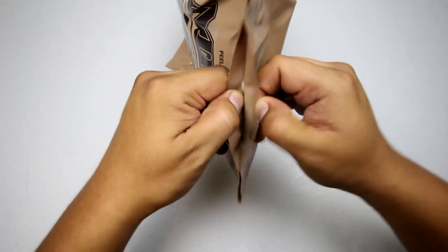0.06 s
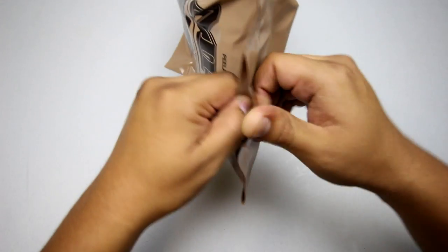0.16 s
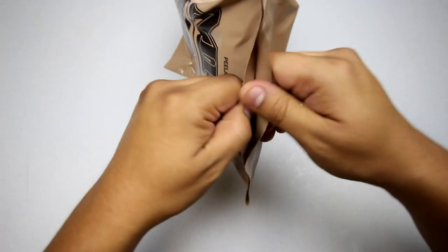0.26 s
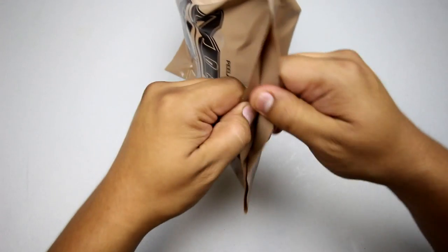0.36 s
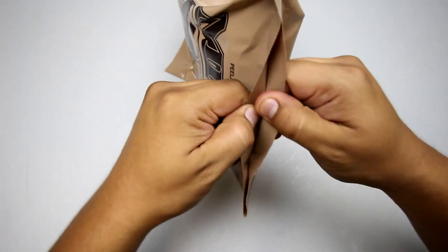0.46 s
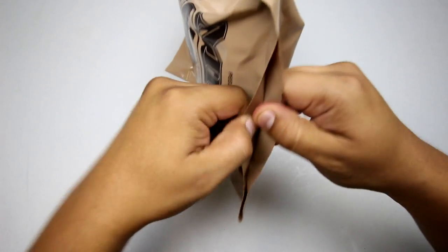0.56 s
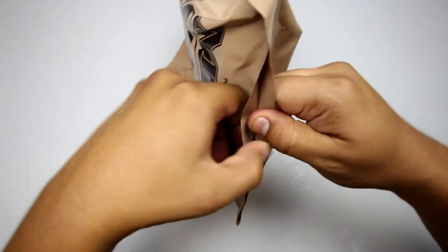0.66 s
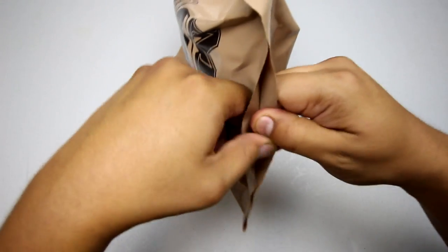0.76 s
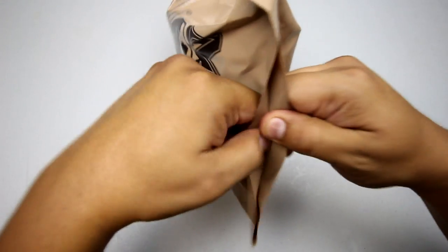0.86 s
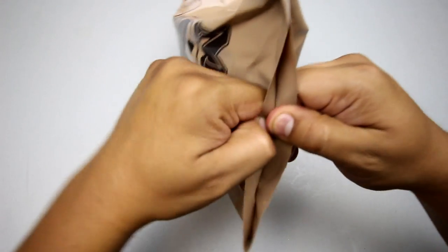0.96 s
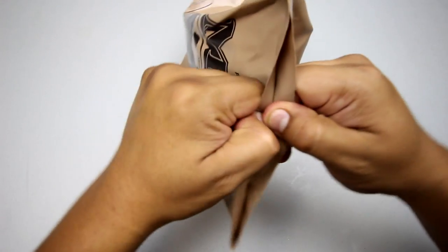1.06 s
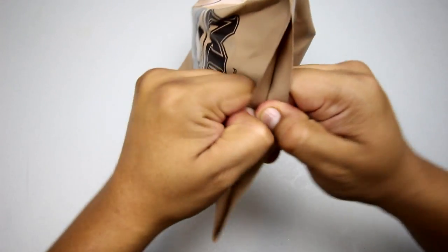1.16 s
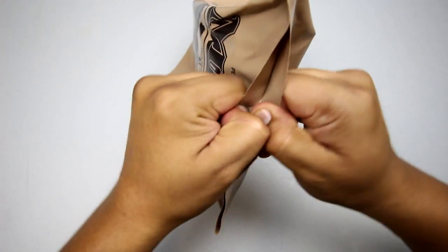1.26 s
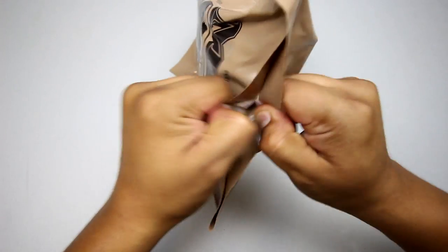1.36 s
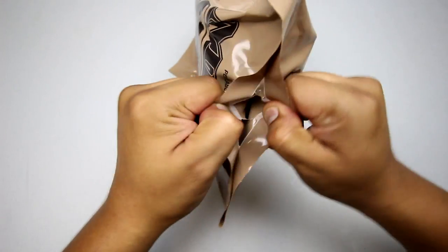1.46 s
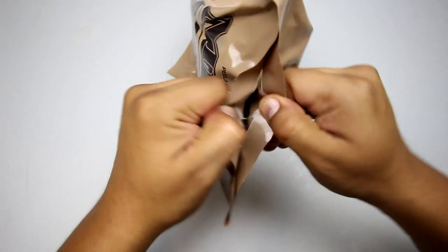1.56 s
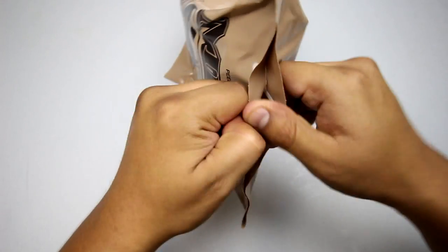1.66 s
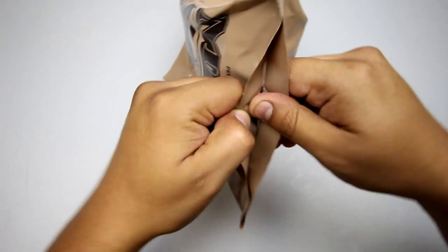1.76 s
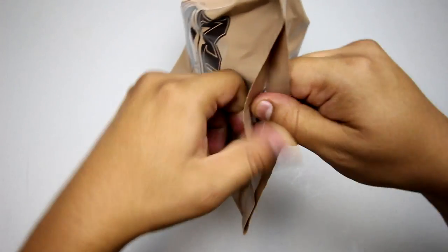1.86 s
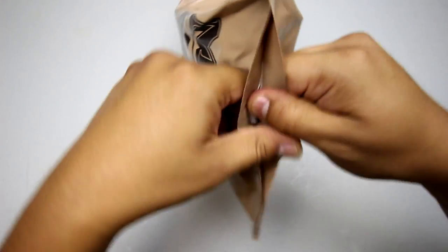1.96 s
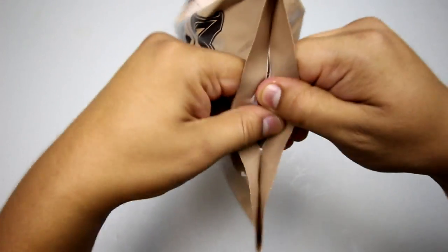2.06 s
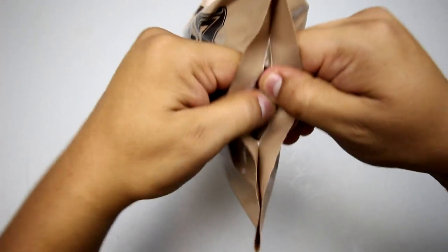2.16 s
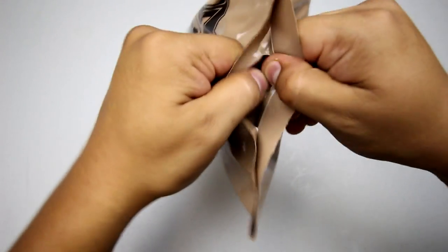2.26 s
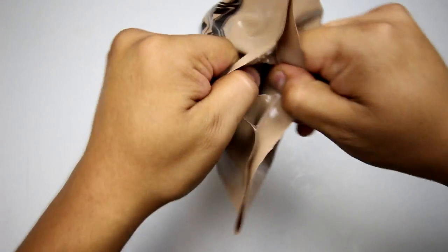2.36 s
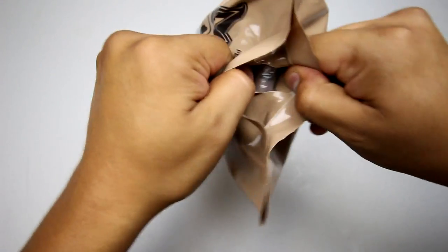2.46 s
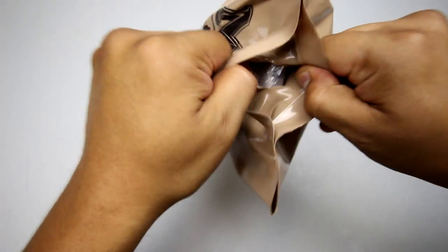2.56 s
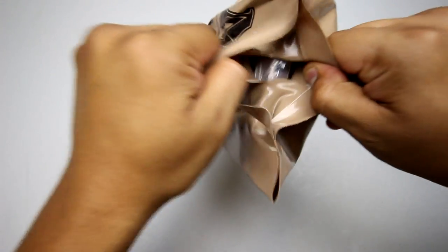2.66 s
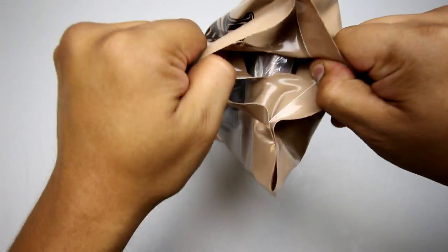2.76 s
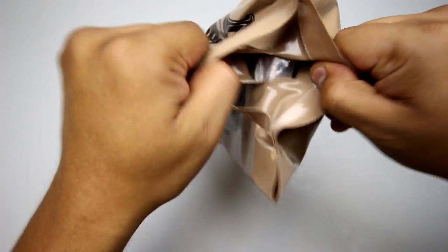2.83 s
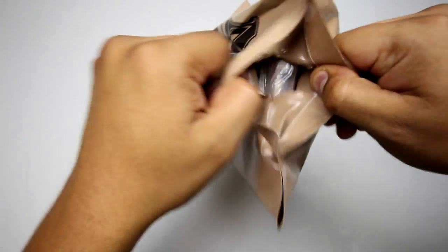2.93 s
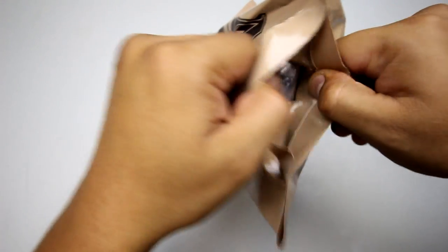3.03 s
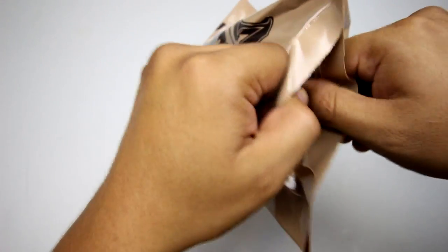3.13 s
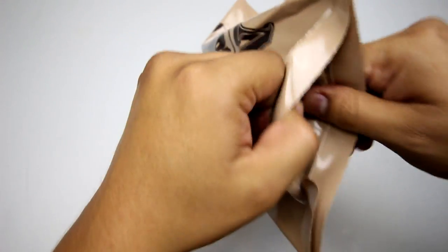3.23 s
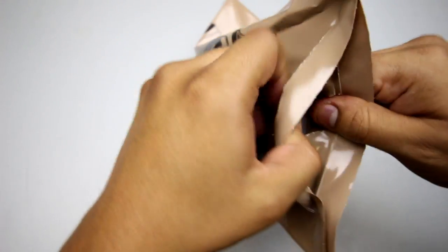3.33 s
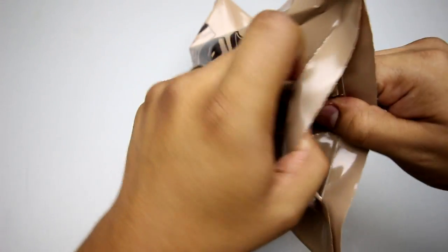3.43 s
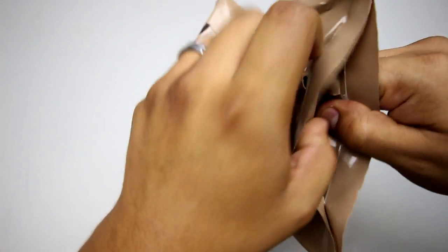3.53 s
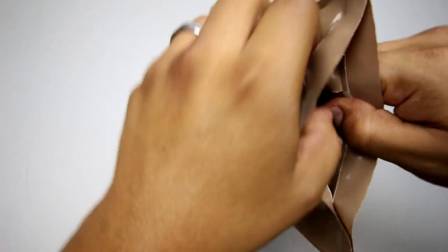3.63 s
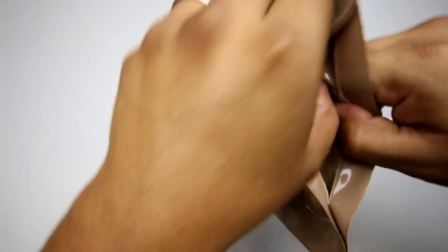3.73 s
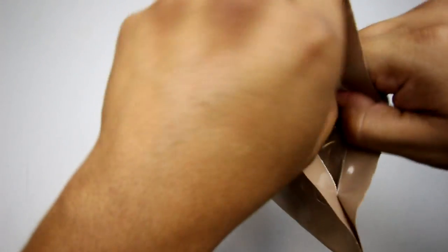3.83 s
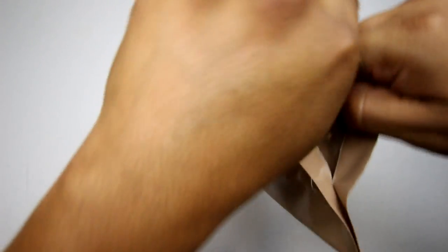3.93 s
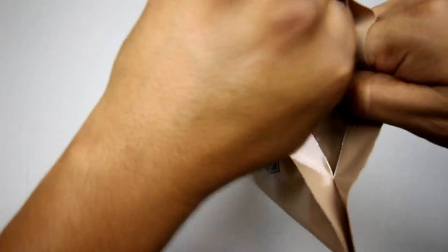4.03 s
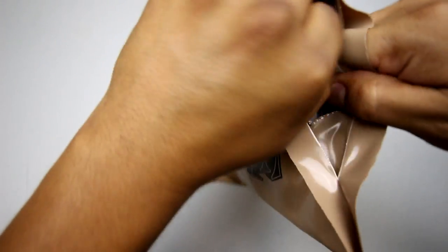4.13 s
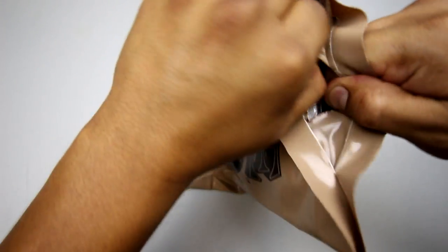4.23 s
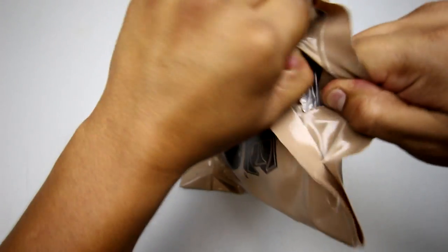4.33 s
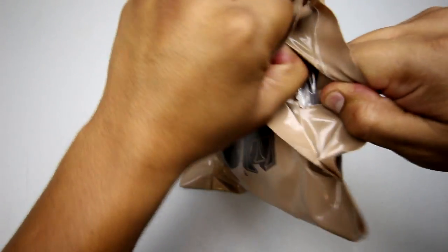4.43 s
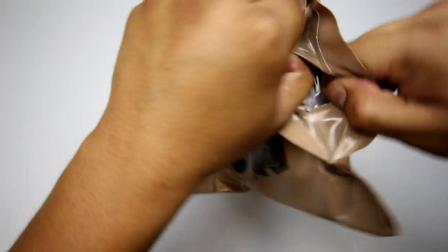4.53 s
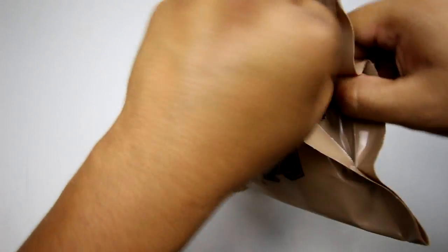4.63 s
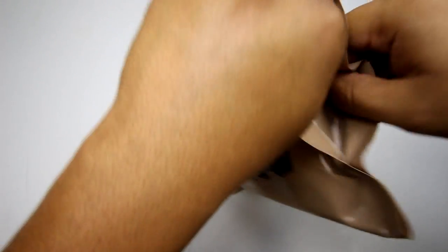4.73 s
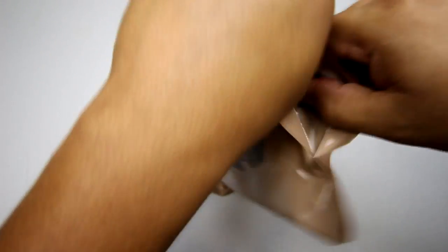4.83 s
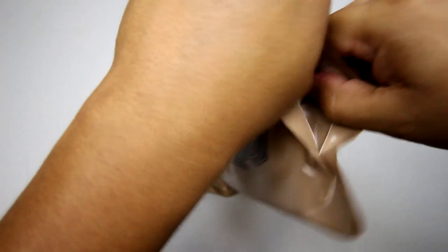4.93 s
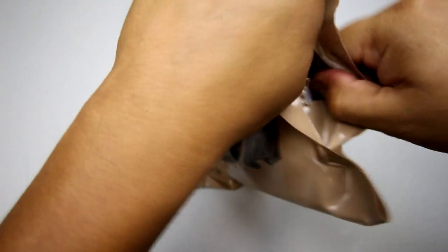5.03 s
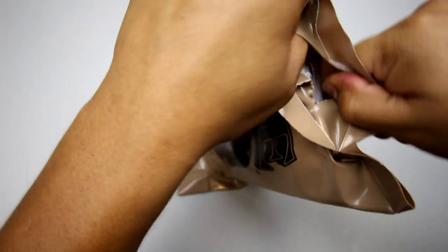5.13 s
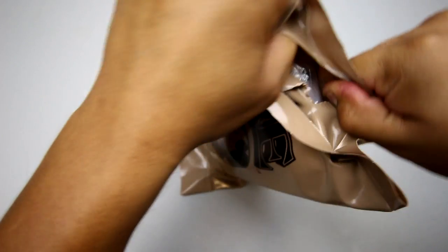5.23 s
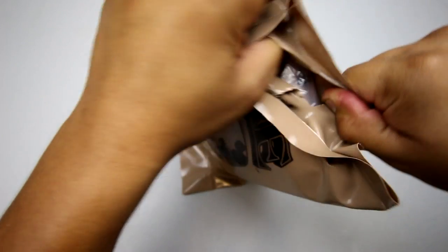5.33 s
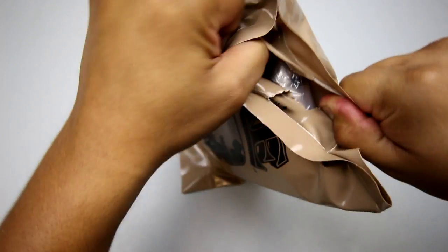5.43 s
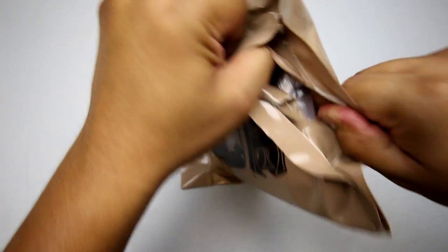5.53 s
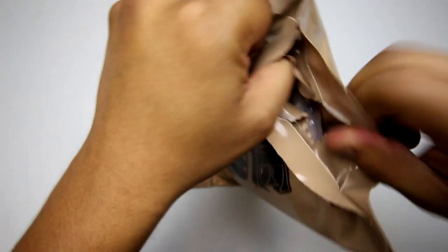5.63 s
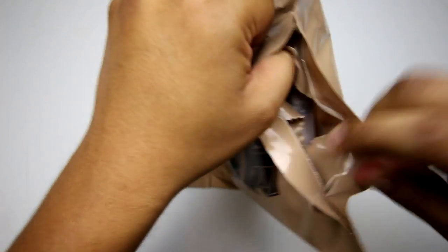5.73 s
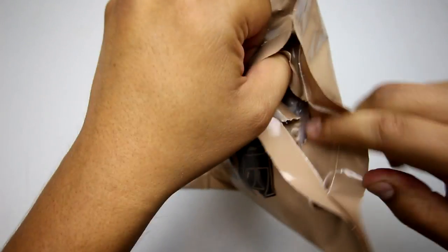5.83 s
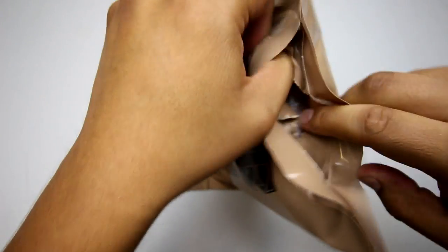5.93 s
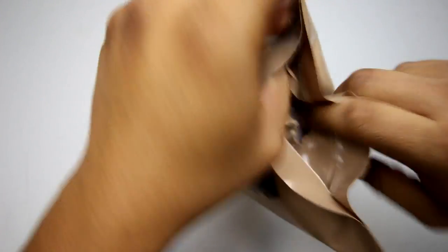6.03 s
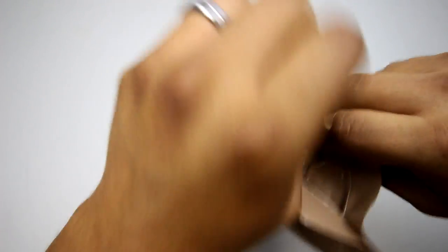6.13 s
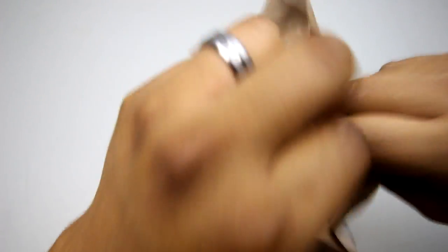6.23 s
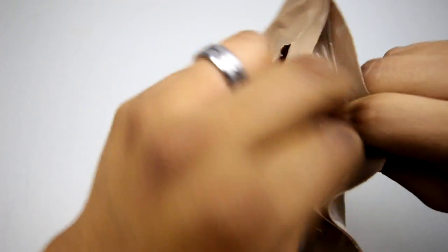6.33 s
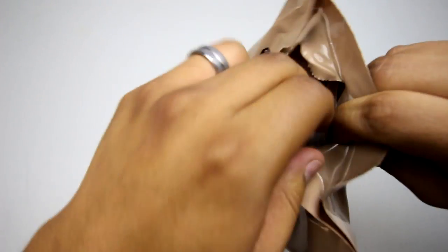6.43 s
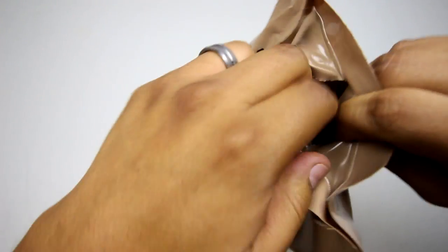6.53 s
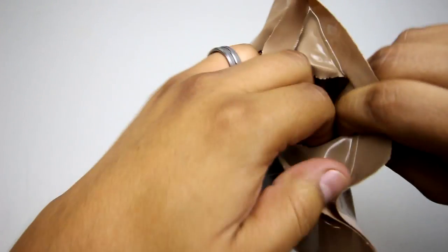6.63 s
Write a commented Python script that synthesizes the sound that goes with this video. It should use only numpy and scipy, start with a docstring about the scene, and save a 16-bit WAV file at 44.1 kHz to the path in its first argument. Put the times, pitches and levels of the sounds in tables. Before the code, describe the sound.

Close, dry crackling of stiff plastic being twisted and pulled by hand. Irregular creases buckle with sharp mid-pitched pops, some with a dull pouch thump, the strongest clipping. Small crinkles, hissy finger rubs and low arm rustle run between them over faint air noise. The bare little room adds a short ring after each snap, and the handling continues to the end.

```python
"""In a small hard room, two hands twist and pull a thick plastic pouch close to two microphones.
Creases buckle with loud snaps (a ringing panel, a pouch thump and a sharp crack) that overload the recorder.
Tiny creases (short damped sines) crinkle in between, and skin rubs and hisses on the sheet (shaped noise).
A thumb drags once along the taut sheet, arms rustle low, and faint air noise runs throughout.
The room rings on after every snap as decaying noise."""
import sys
import numpy as np
from scipy import signal
from scipy.fft import rfft, irfft, next_fast_len
from scipy.io import wavfile
from scipy.ndimage import map_coordinates

SR = 44100
rng = np.random.default_rng(int(sys.argv[2]) if len(sys.argv) > 2 else 0)


def wav_record(signal):
    """Record a signal, one row per channel, as 16-bit PCM in the file named by sys.argv[1]."""
    frames = np.transpose(np.atleast_2d(signal))
    bounded = np.clip(frames, -1, 1)
    # unit amplitude maps onto the largest positive 16-bit level
    quanta = np.round(bounded * 32767).astype(np.int16)
    wavfile.write(sys.argv[1], SR, quanta)


N = 294588  # length in samples, about 6.7 s

# Buckling creases. Each row: start in seconds, peak level in dB ahead of the recorder, panel pitch in Hz,
# thump level in dB against the panel's peak, crack level in dB against the snap's peak.
# The peaks of thump and crack lie a further crest_db above these two levels.
SNAP_EVENTS = [(0.097, -10.5, 890, -8.5, -38), (0.137, -6.5, 850, -15, -23.5), (0.451, -31.5, 1840, -3, -3),
               (0.677, -21.5, 665, -14, -6.5), (0.691, -12.5, 970, -11.5, -40),
               (0.925, -5.5, 6140, -24, -13.5), (0.966, -9.5, 2670, -18.5, -12),
               (0.997, -17, 6500, -26, -10.5), (1.038, -12, 2510, -35, -5.5),
               (1.089, -0.5, 1104, -28.5, -50), (1.321, -17, 634, -10, -12), (1.362, -22, 2000, -21, -12),
               (1.372, -1, 2820, -33, -17.5), (1.38, -16.5, 7000, -30, -6), (1.419, -15.5, 2860, -16, -2),
               (1.455, 6, 3370, -28, -27), (1.464, 3, 1150, -23.5, -18.5), (1.489, -3.5, 1400, -27, -16),
               (1.497, 0, 1410, -39, -18), (1.584, -1, 1340, -12.5, -48), (1.663, 4.5, 1040, -17, -18),
               (1.84, -15, 1320, -17, -16.5), (1.865, -17, 912, 0, -33), (1.936, -9.5, 970, -16, -9.5),
               (2.027, -2.5, 1340, -20, -9), (2.09, -3.5, 1400, -16.5, -10), (2.153, -6.5, 1320, -16, -29),
               (2.295, -26.5, 9000, -24, -7), (2.39, -11.5, 937, -37, -10), (2.428, 7.5, 1290, -46, -25),
               (2.432, 3, 2310, -34, -38), (2.501, -0.5, 920, -17, -13.5), (2.653, 6.5, 2920, -21.5, -19.5),
               (2.657, -3, 1600, -18, -32), (2.754, -7, 1370, -17, -14.5), (2.77, 2.5, 1090, -18, -49),
               (2.818, -9, 1060, -23, -35), (2.923, -14.5, 1300, -41, -8), (2.992, -19, 1170, -11.5, -1.5),
               (3.054, -12.5, 1470, -26, -27), (3.087, -17, 2070, -29, -38), (3.127, -23, 600, -6, -30),
               (3.169, -10, 1680, -16, -9), (3.255, -15, 9100, -21.5, -8.5), (3.362, -9, 2130, -36, -13.5),
               (3.43, -23.5, 3200, -21, -9), (3.461, -16.5, 3830, -22.5, -2.5),
               (3.565, -14.5, 1900, -27, -11.5), (3.573, -23, 2450, -14, -15),
               (3.669, -22.5, 1300, -19, -15), (3.698, -17.5, 1500, -16, -15), (3.723, -10, 1100, -5, -39),
               (3.821, -2.5, 1190, -20, -46), (3.994, -21.5, 5470, -21, -9), (4.041, -7, 1720, -48, -9.5),
               (4.088, -17, 1290, -20, -4.5), (4.214, -23, 910, 10, -1.5), (4.369, -20, 1220, -48, -26),
               (4.49, 1.5, 980, -14, -37), (4.491, 0.5, 3200, -37, -42), (4.625, -26.5, 1800, -30, -2),
               (4.643, -20, 770, 0, -30), (4.689, -26, 9000, -30, 1.5), (4.702, -17.5, 10100, -29, -12),
               (4.726, -12.5, 977, -9, -37), (4.808, -27, 870, 6, -3), (4.856, 7, 1440, -53, -41),
               (4.942, -9.5, 930, -22, -34), (4.983, -19.5, 3200, -14, -25), (5.005, -25, 1500, -30, 0),
               (5.178, 5, 1760, -26.5, -23), (5.216, -8.5, 880, -16.5, -40), (5.273, -18.5, 9000, -30, -22),
               (5.316, -11, 1370, -35, -27), (5.391, -15.5, 8400, -22, -10.5),
               (5.459, -12.5, 2210, -27, -8), (5.488, -7, 3050, -25.5, -13.5),
               (5.593, 3.5, 890, -24.5, -67), (5.667, -15.5, 2210, -28, -10.5),
               (5.774, -12, 3660, -20, -7.5), (5.869, -14.5, 3100, -23, -20), (5.943, -12, 1610, -33, -9),
               (5.999, -20.5, 900, -8, -20), (6.019, -19.5, 1060, -13.5, -2), (6.047, -7, 840, -17, -4),
               (6.052, -9.5, 2800, -19, -17), (6.087, -9, 1190, -18, -5.5), (6.144, -10.5, 950, -17.5, -16),
               (6.21, -13.5, 945, -16, -12), (6.261, -13, 1800, -33, -14), (6.281, -12.5, 1300, -31, -25),
               (6.323, -13.5, 2500, -34, -6), (6.355, -15, 1090, -21, -25), (6.543, -13.5, 870, -18, -9),
               (6.6, -31, 1470, -20, -13), (6.619, -10.5, 2010, -25, -13), (6.675, -10.5, 1800, -10, -4.5)]
# Resonances of the air and walls of the pouch. Each row: pitch in Hz, width in Hz, level in dB.
POUCH_MODES = [(185, 63, -9.5), (302.6, 46, 1.5), (422, 62, -1), (534, 116, -6.5)]

# Tone colours. Each row: frequency in Hz, relative level in dB.
CRACK_COLOUR = [(500, -46), (1500, -8), (3500, -6), (6000, -13.5), (10000, -22), (16000, -32)]  # sharp edge of a snap
RUB_COLOUR = [(70, -59), (200, -4.5), (500, -4), (1200, 1.5), (2800, -3), (4500, -13), (8000, -42.5)]  # skin rubbing on the sheet
HISS_COLOUR = [(900, -53), (3000, 0), (8000, -9), (12500, -18.5), (16000, -44)]  # fine hiss of the skin
RUSTLE_COLOUR = [(20, -26), (50, -1.5), (80, -12.5), (140, 4.5), (250, -5), (500, -36)]  # arms and pushed air
AIR_COLOUR = [(20, -14), (50, -8), (80, -9), (200, -10), (1700, -13.5), (4000, -51), (9000, -33),
              (16000, -39)]  # steady background
WALL_COLOUR = [(100, -22), (350, 1), (1500, -2.5), (4000, 0.5), (10000, -7.5)]  # the walls' answer

# How long the room rings. Each row: frequency in Hz, time to fall by 60 dB in seconds.
ROOM_DECAY = [(150, 0.23), (500, 0.48), (1500, 0.36), (4000, 0.38), (10000, 0.91)]
# How alike left and right are. Each row: frequency in Hz, likeness from 0 to 1.
LEFT_RIGHT_LIKENESS = [(60, 0.68), (300, 0.85), (1500, 0.76), (6000, 0.43), (14000, 0.057)]
# Steady working of the sheet. Each row: time in seconds, crinkle drive in dB, fine hiss drive in dB.
STEADY_GRIP = [(0.0, -41.5, -49), (0.28, -43, -52), (0.6, -55, -51.5), (0.79, -46.5, -50.5),
               (1.27, -34.5, -46.5), (1.6, -27, -51), (1.9, -38, -47), (2.34, -38.5, -44.5),
               (2.6, -29, -41), (2.9, -36, -55), (3.2, -34, -43), (3.55, -38.5, -46.5), (3.95, -38.5, -46),
               (4.4, -40, -46), (4.62, -30, -45), (5.1, -44, -44), (5.53, -36, -46), (5.9, -32, -41.5),
               (6.42, -30, -40), (6.68, -36, -60)]
# Slides and squeezes of the fingers. Each row: start in seconds, length in seconds, crinkle drive in dB,
# fine hiss drive in dB, low rustle drive in dB.
FINGER_STROKES = [(0.158, 0.033, -34.5, -35.5, -41), (0.33, 0.032, -44, -40.5, -58),
                  (0.42, 0.069, -33.5, -51, -49), (0.776, 0.26, -28.5, -45, -38),
                  (1.438, 0.062, -17, -36, -35), (2.019, 0.18, -26, -36, -39),
                  (2.48, 0.041, -17.5, -52, -40), (2.717, 0.073, -31, -41, -38.5),
                  (2.974, 0.1, -53, -60, -36.5), (3.147, 0.04, -50, -56, -32.5),
                  (3.736, 0.11, -31, -38, -49), (3.992, 0.29, -33, -43.5, -65),
                  (4.655, 0.038, -46, -38, -35.5), (4.82, 0.25, -29, -42.5, -50),
                  (5.043, 0.16, -34.5, -62, -34.5), (5.67, 0.14, -31.5, -40, -47),
                  (5.998, 0.064, -25.5, -36.5, -36.5), (6.179, 0.16, -25.5, -32, -49),
                  (6.443, 0.069, -32.5, -38.5, -47), (6.593, 0.037, -26.5, -29.5, -45)]

SWELL, LET_GO_DB_PER_S = 0.29, 309  # share of a stroke spent swelling; fall after it ends
SETTLE_DB, SETTLE_T60_S = -32.5, 0.48  # crinkle drive left by a snap, against its peak; time to fall 60 dB
FIZZ_DB, FIZZ_T60_S = -12.5, 0.17  # hiss drive left by a snap, against its crack level; time to fall 60 dB
SLIDE_START_S, SLIDE_LENGTH_S, SLIDE_DB = 0.83, 0.22, -32.5
SLIDE_HZ, SLIDE_WIDTH_HZ = 1800, 220
RUSTLE_DB = -52.5  # steady low rustle under the strokes
TOP_HZ = 15720  # the recorder keeps nothing from here up


def snaps(rise_s=0.001096, hold_s=0.0029, burst_s=0.0069, crack_s=0.025, flip=7, sharp=3.0, crest_db=8, size=4400):
    """A crease flips with a kick and a ragged burst: its panel rings, the pouch thumps, the edge cracks."""
    start, db, hz, thump_db, crack_db = (c[:, None] for c in np.transpose(SNAP_EVENTS))
    t = np.arange(size) / SR
    noise = rng.standard_normal((len(start), 5, size)).transpose(1, 0, 2)
    rise = np.minimum(t / rise_s, 1) ** 4

    # ragged burst, plus a one-sample kick of random direction as the crease flips
    burst = noise * rise * amp(-60 * np.maximum(t - hold_s, 0) / burst_s)
    kick = flip * np.sign(noise[..., :1]) * (np.arange(size) == round(rise_s * SR))
    jolt = burst + kick

    stiff = lambda f: 1 / (1 + 1j * f / (hz + 2600)) ** 3  # the thick sheet passes little treble
    panel = lambda f: stiff(f) * (resonance(f, hz, hz / sharp) + 0.24 * resonance(f, 1110, 2000))
    panel_ring = peak(filtered(jolt[0], panel))

    # neighbouring pouch resonances push in opposite directions
    modes = lambda f: sum((-1) ** k * amp(g) * resonance(f, c, w) for k, (c, w, g) in enumerate(POUCH_MODES))
    pouch = lambda f: modes(f) * resonance(f, 500, 510)
    thump = amp(thump_db + crest_db) * peak(filtered(jolt[1], pouch))
    body = panel_ring + thump

    # the sheet around the crease shakes on
    loose = lambda f: stiff(f) * resonance(f, hz, 1.33 * hz) * resonance(f, 1430, 2400)
    shiver = noise[-1] * np.minimum(t / 0.0051, 1) ** 2 * amp(-60 * t / 0.1)
    body = body + amp(-14.0) * peak(filtered(shiver, loose))

    edge = noise[2:-1] * rise * amp(-60 * t / crack_s)
    crack = amp(crest_db + crack_db) * peak(paired(*edge, CRACK_COLOUR))
    return placed(start[:, 0], amp(db) * (peak(body) + crack))


def crinkle(dull_power, bright_power):
    """Working the sheet sets off clumps of small creases over rub and hiss of skin; snaps stir them up."""
    _, db, _, _, crack_db = np.transpose(SNAP_EVENTS)
    dull_gain = np.sqrt(dull_power + settling(db + SETTLE_DB, SETTLE_T60_S))
    bright_gain = np.sqrt(bright_power + settling(db + crack_db + FIZZ_DB, FIZZ_T60_S))
    clump = wobble(55)  # shared, so all four layers tend to swell together
    dull = amp(1.9 * clump + 1.9 * wobble(60) - 8.5) * grains(1565, 0.716, 1.5, 1.6, 3e-5, count=3000, size=220)
    bright = amp(1.8 * clump + wobble(78) - 9) * grains(6550, 0.42, 3.4, 2.6, 4e-5, count=1500, size=70)
    rub = amp(1.3 * clump + 2.32 * wobble(140) - 3.5) * rush(RUB_COLOUR)
    hiss = amp(1.12 * clump + 2.06 * wobble(110) - 1.0) * rush(HISS_COLOUR)
    return dull_gain * (dull + rub) + bright_gain * (bright + hiss)


def grains(hz, spread, cycles, tail_db, lag_s, count, size):
    """Tiny creases: damped sines of random pitch and size from random spots of the sheet, rms 1."""
    when, chance = rng.random((2, count, 1))
    tune, spot = rng.standard_normal((2, count, 1))
    pitch = np.clip(hz * np.exp(spread * tune), 100, SR / 3)
    side_lag = lag_s * spot * np.array([1, -1])[:, None, None]  # one side hears it earlier
    t = np.maximum(np.arange(size) / SR - 2e-4 + side_lag, 0)
    loudness = amp(-tail_db * np.log(chance + 0.012))  # many small, few large
    rows = loudness * np.sin(2 * np.pi * pitch * t) * np.exp(-t * pitch / cycles)
    fade_in = np.minimum(t * pitch * 2, 1)  # over half a cycle
    return unit(placed(when[:, 0] * N / SR, rows * fade_in))


def strokes():
    """Power of crinkle, hiss and rustle: the steady grip plus strokes that swell, hold and let go."""
    t = np.arange(N) / SR
    power = amp([*curves(STEADY_GRIP), np.full(N, RUSTLE_DB)]) ** 2
    for start, length, *levels_db in FINGER_STROKES:
        swell = np.clip((t - start) / (SWELL * length), 0, 1) ** 2
        shape = swell * amp(-LET_GO_DB_PER_S * np.maximum(t - start - length, 0))
        power = power + (amp(levels_db)[:, None] * shape) ** 2
    return power


def settling(db, t60):
    """Power that starts at each snap and dies away, as the stirred sheet settles."""
    at = np.round(np.transpose(SNAP_EVENTS)[0] * SR).astype(int)
    starts = np.bincount(at, amp(db) ** 2, N)
    keep_per_sample = amp(-60 / (t60 * SR)) ** 2
    return signal.lfilter([1], [1, -keep_per_sample], starts)


def slide():
    """A thumb drags along the taut sheet and excites one band of it, which swells and fades."""
    progress = np.clip((np.arange(N) / SR - SLIDE_START_S) / SLIDE_LENGTH_S, 0, 1)
    shape = np.sqrt(np.abs(np.sin(np.pi * progress)))
    band = unit(filtered(rng.standard_normal(N), lambda f: resonance(f, SLIDE_HZ, SLIDE_WIDTH_HZ)))
    return amp(SLIDE_DB) * shape * band


def room(x, gap_s=0.0018, count=20, size=22000):
    """The walls' answer; it changes as hands and pouch move, and each frequency dies at its own speed."""
    hz, t, z = signal.stft(rng.standard_normal((2, count, size)), SR, nperseg=256)
    decay = amp(-60 * t / along(ROOM_DECAY, hz)[:, None])
    tails = signal.istft(z * decay, SR, nperseg=256)[1][..., :size]
    after_gap = np.arange(size) > gap_s * SR  # the echo takes a moment to return
    tails = paired(*tails * after_gap, WALL_COLOUR)
    tails = tails / np.sqrt(np.sum(tails[0] ** 2) / count)
    # cut the sound into equal stretches, each with its own echo tail
    step = N // count + 1
    parts = np.pad(x, (0, step * count - N)).reshape(count, step)
    wet = signal.fftconvolve(parts[None], tails, axes=2)
    return placed(np.arange(count) * step / SR, wet)


def rustle(power):
    """Arms and pushed air: low noise whose level wanders in soft lumps."""
    return np.sqrt(power) * amp(1.6 * wobble(24)) * rush(RUSTLE_COLOUR)


def air():
    """Faint steady background: shaped noise."""
    return amp(-45.5) * rush(AIR_COLOUR)


def rush(spectrum):
    """Coloured stereo noise of rms 1."""
    return unit(paired(*rng.standard_normal((2, N)), spectrum))


def paired(mid, side, spectrum):
    """Two unrelated signals coloured and mixed so that left and right are as alike as the table says."""
    turn = lambda f: np.arccos(np.clip(along(LEFT_RIGHT_LIKENESS, f), -1, 1)) / 2
    mid = filtered(mid, lambda f: amp(along(spectrum, f)) * np.cos(turn(f)))
    side = filtered(side, lambda f: amp(along(spectrum, f)) * np.sin(turn(f)))
    return np.array([mid + side, mid - side])


def resonance(f, hz, width):
    """Response of something that rings at hz; a narrower width rings longer."""
    return 1j * f * width / (hz * hz - f * f + 1j * f * width)


def filtered(x, response):
    """The sound x with its spectrum multiplied by a response that depends on frequency."""
    n = x.shape[-1]
    m = next_fast_len(n + 512)
    return irfft(rfft(x, m) * response(np.fft.rfftfreq(m, 1 / SR)), m)[..., :n]


def placed(start, rows):
    """Stereo rows summed at their start times in seconds."""
    first = np.round(start * SR).astype(int)[:, None]
    at = (first + np.arange(rows.shape[-1])).ravel()
    return np.array([np.bincount(at, r.ravel(), N + rows.shape[-1])[:N] for r in rows])


def wobble(rate):
    """A smooth random curve, with rate random points a second."""
    points = rng.standard_normal(int(N * rate / SR) + 4)
    return map_coordinates(points, [np.arange(N) * rate / SR])


def curves(rows):
    """One value per sample for each column after the time."""
    times, *columns = np.transpose(rows)
    return [np.interp(np.arange(N) / SR, times, c) for c in columns]


def along(points, hz):
    """Value at hz, read between (Hz, value) points on a log axis."""
    f, v = np.transpose(points)
    return np.interp(np.log(hz + 1), np.log(f + 1), v)


def amp(db):
    """Decibels to a plain multiplier."""
    return 10 ** (np.asarray(db) / 20)


def unit(x):
    """The sound brought to rms 1."""
    return x / np.sqrt(np.mean(x ** 2) + 1e-20)


def peak(rows):
    """Each row brought to peak 1."""
    return rows / np.abs(rows).max(axis=-1, keepdims=True)


def scene():
    """Snaps, crinkle and slide, with the room answering them, over rustle and air."""
    dull_power, bright_power, low_power = strokes()
    loud = snaps()
    fine = crinkle(dull_power, bright_power) + slide()
    wet = room(amp(-8.5) * loud.mean(axis=0) + amp(-13.5) * fine.mean(axis=0))
    return loud + fine + wet + rustle(low_power) + air()


def record(dry):
    """The left port is less sensitive; loud snaps hit full scale; nothing is kept above the band limit."""
    x = dry * amp([[-1.7], [1.7]])  # left, right
    x = x / (1 + np.abs(x) ** 8) ** (1 / 8)  # overload: bends only near full scale
    return filtered(x, lambda f: f < TOP_HZ)


dry = scene()
out = record(dry)
wav_record(out)
```